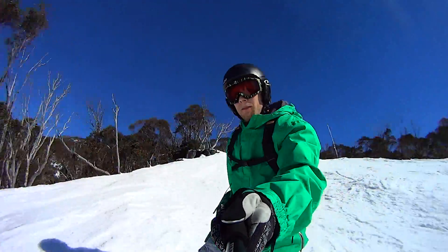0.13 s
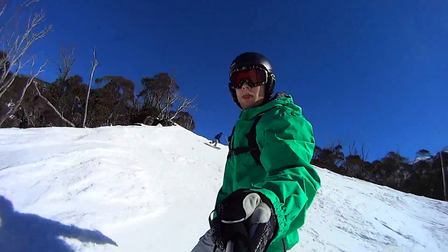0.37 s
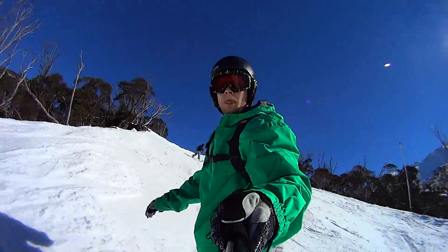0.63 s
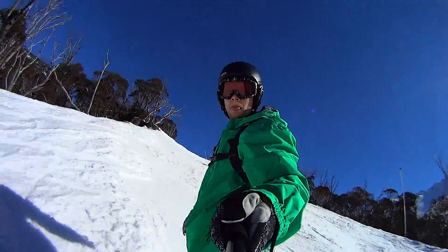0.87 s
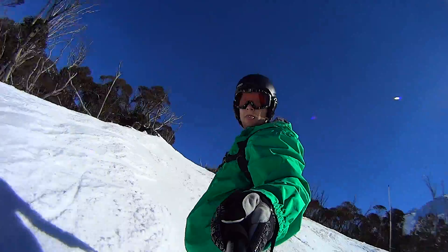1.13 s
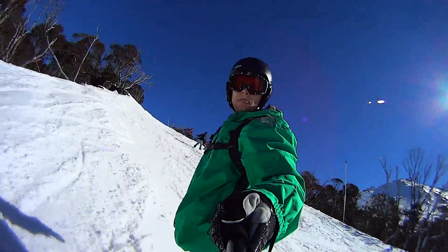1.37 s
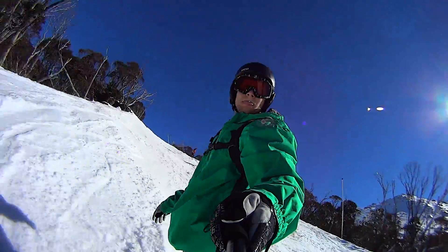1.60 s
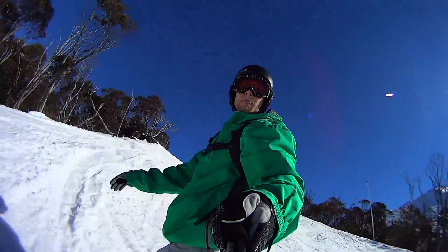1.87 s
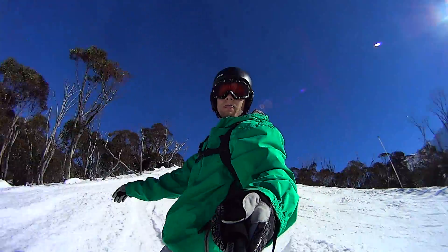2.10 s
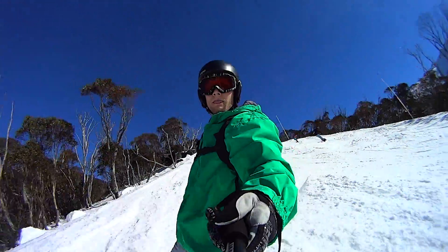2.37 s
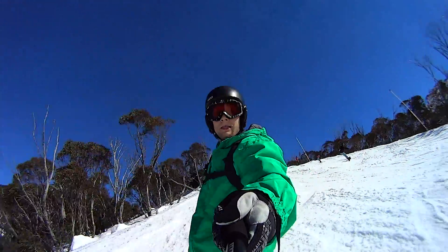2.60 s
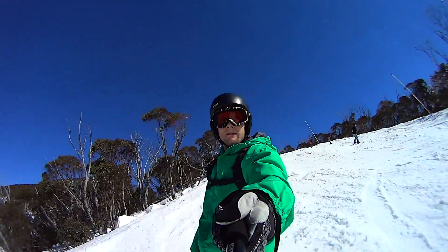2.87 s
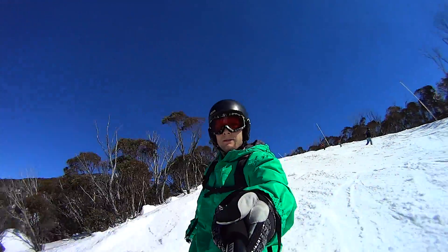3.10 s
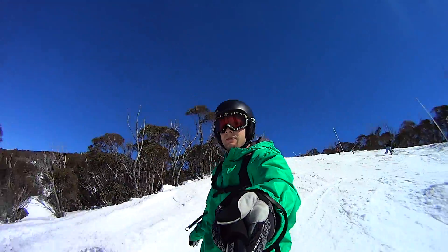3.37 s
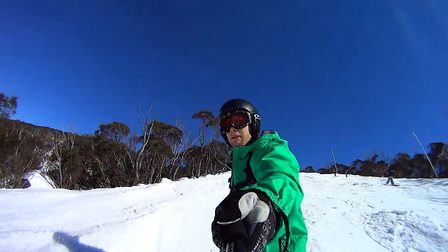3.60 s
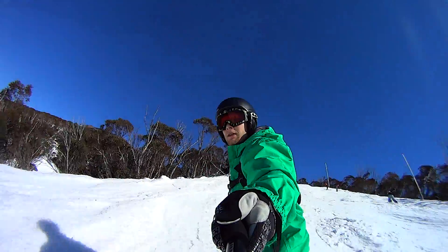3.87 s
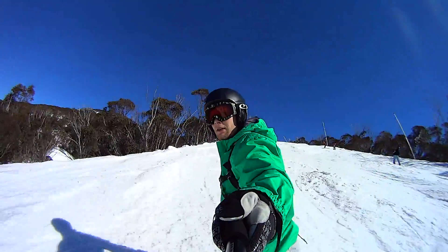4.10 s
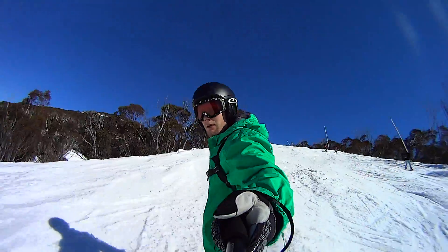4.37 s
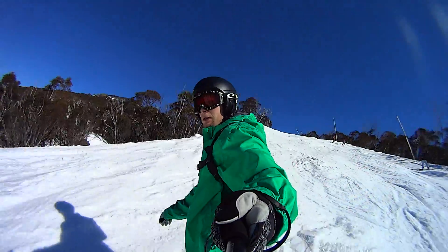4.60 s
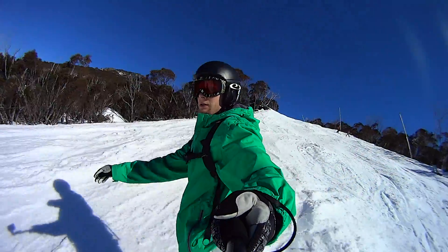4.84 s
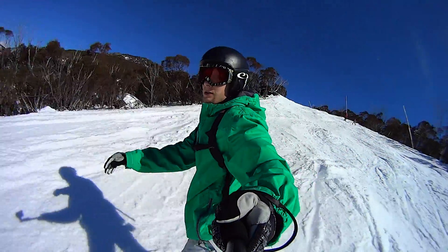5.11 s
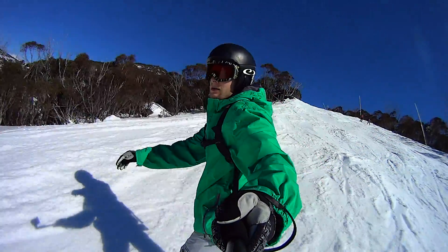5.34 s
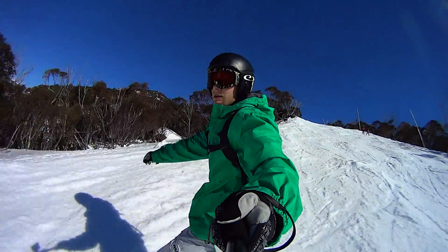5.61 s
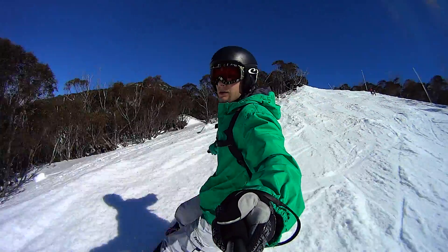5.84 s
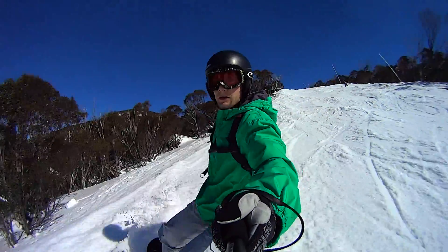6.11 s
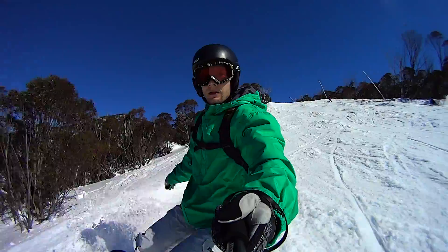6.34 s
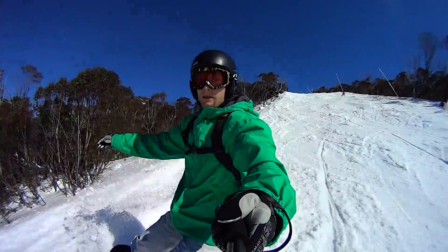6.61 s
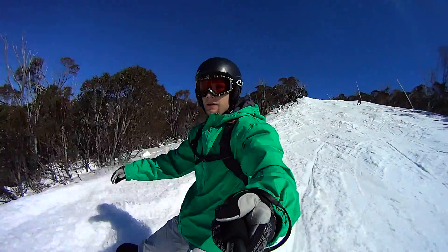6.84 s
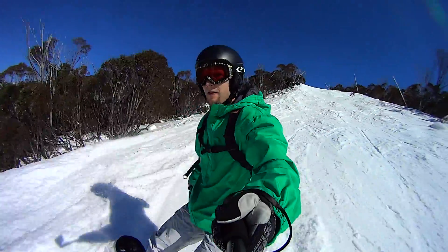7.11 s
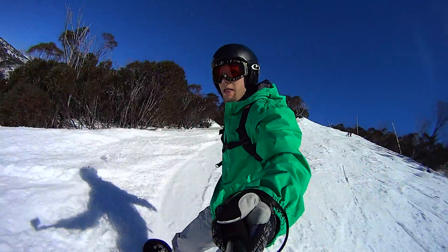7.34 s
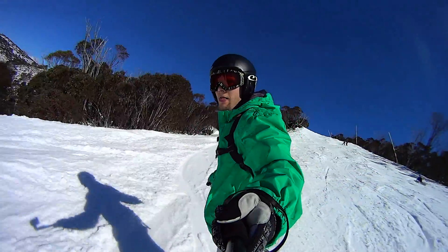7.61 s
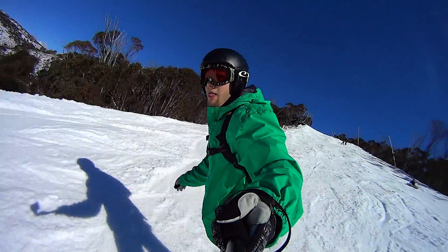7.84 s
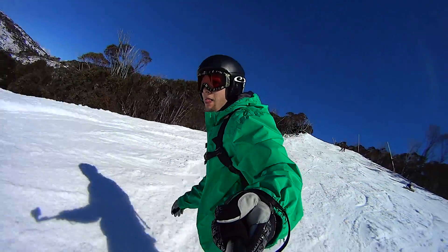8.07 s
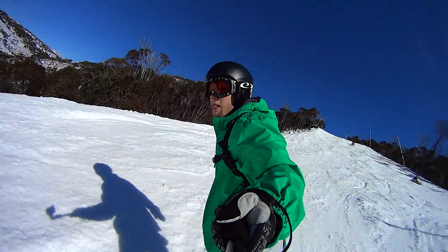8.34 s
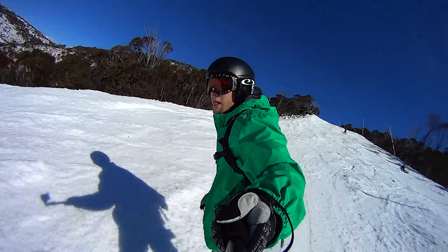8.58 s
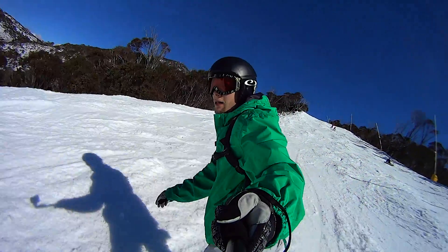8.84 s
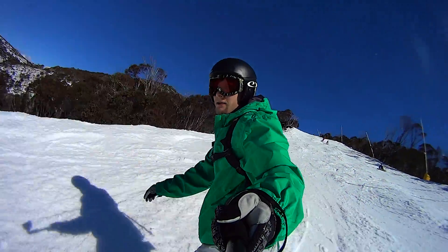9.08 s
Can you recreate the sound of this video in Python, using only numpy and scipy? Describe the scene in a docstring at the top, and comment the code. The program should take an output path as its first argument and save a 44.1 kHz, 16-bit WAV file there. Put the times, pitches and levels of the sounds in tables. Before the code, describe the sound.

A snowboard glides over packed snow with a thin, grainy hiss and short edge scrapes. Just after two seconds, jolts thump the pole and its plastic mount clacks and rattles. Strong scrapes follow at around three and five seconds, then three long harsh carves near the end. Outdoors on an open slope, heard close through a sealed plastic case, coloured boxy and nasal, with low rumble.

```python
"""A snowboard slides and carves over packed snow: its edge crushes grains into scrape, low grind and fine spray.
The microphone is a camera's two ports, shut in a hard plastic case on a hand-held pole.
Noise grains ring the resonances of the case, and crusts breaking under the edge briefly change their level.
Filtered noise makes the low rumble of the shaken case; jolts up the pole are struck boom and knock modes.
The mount clacks as ringing modes, and around the clacks it shudders as a hollow chatter of grains."""
import sys
import numpy as np
from scipy import signal
from scipy.fft import next_fast_len
from scipy.io import wavfile

SR = 44100
rng = np.random.default_rng(int(sys.argv[2]) if len(sys.argv) > 2 else 0)


def to_wav(s):
    """Save 16-bit WAV."""
    ch = np.atleast_2d(s).T  # columns
    pcm = np.round(np.clip(ch, -1, 1) * 32767)  # PCM
    wavfile.write(sys.argv[1], SR, pcm.astype(np.int16))


def magnitude_from_level(level_db):
    """Linear magnitude for a level in decibels (20 dB per decade)."""
    exponent = np.asarray(level_db, float) / 20
    return 10 ** exponent


N = 406161  # length in samples
CONTROL_STEP = 20  # samples between the points of a slow control


def in_time(rows):
    """Columns of a curve table, drawn as straight lines between its times, at every sample."""
    seconds, *columns = np.transpose(rows)
    return [np.interp(np.arange(N) / SR, seconds, column) for column in columns]


def every_sample(coarse):
    """A slow control filled in between its points."""
    return np.interp(np.arange(N) / CONTROL_STEP, np.arange(len(coarse)), coarse)


def rms_one(x):
    """Scaled to unit power."""
    return x / np.sqrt(np.mean(np.abs(x) ** 2) + 1e-20)


def drift(rate_hz):
    """Slow random wander of unit rms: noise through two equal low-pass poles."""
    r = np.exp(-2 * np.pi * rate_hz * CONTROL_STEP / SR)
    settle = 2000
    noise = rng.standard_normal(N // CONTROL_STEP + 2 + settle)
    slow = signal.lfilter([1], [1, -2 * r, r * r], noise)[settle:]
    return every_sample(rms_one(slow))


def swells(starts, holds, peaks_db, rise_db_per_s, fall_db_per_s):
    """Power of each event as it rises to its peak, holds and falls: one row an event, in control steps."""
    starts, holds, peaks_db = [np.reshape(column, (-1, 1)) for column in (starts, holds, peaks_db)]
    t = np.arange(0, N + CONTROL_STEP, CONTROL_STEP) / SR - starts
    before_db = rise_db_per_s * np.maximum(-t, 0)
    after_db = fall_db_per_s * np.maximum(t - holds, 0)
    return magnitude_from_level(2 * (peaks_db - np.minimum(before_db + after_db, 100)))


def band(x, low_hz, high_hz):
    """Band-pass falling 12 dB an octave on each side."""
    return signal.sosfilt(signal.butter(2, [low_hz, high_hz], "band", fs=SR, output="sos"), x)


def crushing(spread_db, bumps_db, crunch_db):
    """Dense grains of uneven size in bumps and quick clumps: one stream both ports share, one more for each."""
    sizes = magnitude_from_level(spread_db * np.minimum(rng.exponential(1, N), 5))
    clumps = magnitude_from_level(bumps_db * drift(21) + crunch_db * drift(51))
    return rng.standard_normal((3, N)) * sizes * clumps


def through(modes, streams, flicker_db, brightness_db=0):
    """The grains ring each resonance; each reaches the two ports with its own balance, phase and likeness."""
    shared = signal.hilbert(streams[0], next_fast_len(N))[:N]
    out = np.zeros((2, N))
    for k, (hz, width_hz, level_db, pan_db, lead, alike) in enumerate(modes):
        r = np.exp(-np.pi * width_hz / SR)
        resonance = [(1 - r * r) / 2, 0, (r * r - 1) / 2, 1, -2 * r * np.cos(2 * np.pi * hz / SR), r * r]
        # wall and cavity ring in turn: the resonance acts twice, so its skirts fall steeply
        twice = [resonance, resonance]
        both = np.real(signal.sosfilt(twice, shared) * np.exp([[.5j * lead], [-.5j * lead]]))
        own = signal.sosfilt(twice, streams[1:])
        share = np.sqrt(alike)
        tone = np.sqrt(share) * both + np.sqrt(1 - share) * own
        # brightness acts from 2200 Hz up, in step with the octave, in full from about 12 kHz
        lift_db = brightness_db * np.clip(np.log2(hz / 2200) / 2.46, 0, 1)
        gain = magnitude_from_level(level_db + lift_db + flicker_db * drift(6.5))
        out += (-1) ** k * gain * tone * magnitude_from_level([[pan_db / 2], [-pan_db / 2]])
    return out


# The board gliding flat over the snow.
# Each row: time in seconds, scrape in dB, fineness of the snow in dB (lifts spray and upper case resonances).
GLIDE = [(0.0, -32.5, 0.5), (0.2, -30.5, 1.5), (0.34, -38, 0.5), (0.7, -33.5, -1), (1.08, -31.5, 1.5),
         (1.39, -36, -6), (1.6, -33, -3), (1.94, -33, -1.5), (1.99, -39.5, -1.5), (2.18, -38, -2.5),
         (2.66, -34, -2), (2.72, -32.5, 0.5), (2.92, -30, 3), (3.25, -25, 4.5), (3.55, -26, 4),
         (3.66, -34, 1.5), (4.0, -33, -0.5), (4.3, -30, 1), (4.64, -28.5, 2.5), (4.78, -31.5, 1.5),
         (5.26, -25, 5.5), (5.58, -30.5, 1), (5.67, -38, 1), (5.76, -32.5, 4.5), (5.96, -32, -1.5),
         (6.1, -30.5, 4), (6.6, -30.5, 2), (7.28, -31.5, 2.5), (7.44, -38, 2.5), (7.62, -36, -2),
         (8.8, -31, 2.5), (9.21, -28.5, 3.5)]
# The edge biting into the snow.
# Each row: start of full bite in seconds, hold in seconds, scrape in dB,
# brightness in dB of the upper case resonances.
BITES = [(0.136, .05, -29, -23), (0.225, 0.019, -27.5, -14), (0.402, 0.074, -32, -3),
         (0.574, 0.039, -33.5, -13), (0.798, 0.053, -32.5, 7), (0.877, 0.029, -22.5, -3),
         (1.18, 0.077, -31.5, 6), (2.232, .02, -31, -13), (2.36, 0.11, -31.5, -17),
         (2.485, .04, -31.5, -12), (2.73, 0.022, -27, 0), (2.85, .015, -28.5, 2),
         (3.295, 0.023, -19.5, -14), (3.38, 0.038, -15, -9), (3.534, 0.05, -15, -13),
         (4.113, 0.024, -30, 2), (4.247, .02, -28.5, 16), (4.34, 0.15, -27.5, -7),
         (4.693, 0.013, -25.5, -8), (4.875, 0.022, -33, -9), (4.997, .004, -33, -26),
         (5.071, 0.11, -17.5, -18.5), (5.325, 0.11, -17, -25.5), (5.715, 0.033, -29.5, -18),
         (5.795, 0.027, -30.5, -21), (6.043, .01, -29, -18), (6.114, 0.0044, -35.5, -7),
         (6.235, .015, -27, -8), (6.335, 0.043, -29, 5), (6.474, 0.028, -27, -1), (7.248, 0.033, -29.5, -9),
         (7.723, 0.297, -15, -12), (8.075, 0.32, -14.5, -10.5), (8.435, 0.27, -15.5, -5.5),
         (8.89, 0.059, -20.5, -13.5), (9.047, .025, -26.5, -24), (9.148, 0.038, -21, -21)]
BITE_RISE_DB_PER_S, BITE_FALL_DB_PER_S = 190, 220
GLIDE_BRIGHTNESS_DB, FINE_BRIGHTENS = 0.5, 0.45  # brightness at zero fineness; dB per dB of fineness


def edge():
    """Glide and bites add in power, and their brightness is averaged by power, so the loudest sets it."""
    glide_db, fine_db = in_time(GLIDE)
    starts, holds, peaks_db, bites_bright_db = np.transpose(BITES)
    bites = swells(starts, holds, peaks_db, BITE_RISE_DB_PER_S, BITE_FALL_DB_PER_S)
    glide = magnitude_from_level(2 * glide_db)
    power = glide + every_sample(bites.sum(axis=0))
    glide_bright_db = GLIDE_BRIGHTNESS_DB + FINE_BRIGHTENS * fine_db
    weighted = glide * glide_bright_db + every_sample(bites_bright_db @ bites)
    return 10 * np.log10(power), weighted / power, fine_db


# Resonances of the closed case around the microphone.
# Each row: frequency in Hz, width in Hz, relative level in dB, left over right in dB,
# lead of the left port in radians, left-right likeness from 0 to 1.
CASE = [(1025, 700, -10.5, 19, 3.6, 0), (1402, 406, 4, 9, 1.2, 0.73), (1587, 591, 13.5, 3.5, 0.82, 0.99),
        (2303, 480, -6.5, -4, 1.53, 0.3), (3013, 468, 5, 2.5, 0.28, 0.04), (3500, 510, -13.5, -7, 0.31, 1),
        (3960, 326, -5, -5.5, 0.76, 0.05), (5012, 910, 0.5, 0, 0.45, 0.98), (5300, 550, -7.5, -4, 0.76, 0),
        (6460, 1300, -27, 21, 0.78, 0.6)]


def scrape(snow, scrape_db, brightness_db):
    """Crushed grains and breaking crusts ring the case, brighter or duller as the edge moves."""
    bright_swing_db = brightness_db - np.mean(brightness_db)
    tone = through(CASE, snow * crusts(), flicker_db=1.0, brightness_db=bright_swing_db)
    return magnitude_from_level(scrape_db) * rms_one(tone)


# Low resonances that the grains set grinding.
# Each row: frequency in Hz, width in Hz, relative level in dB, left over right in dB,
# lead of the left port in radians, left-right likeness from 0 to 1.
GRIND = [(258, 470, 3.85, 0.24, 1.38, 0.64), (566, 283, 1, 0.21, 1.7, 0.1),
         (821, 580, 1.1, 0.33, 0.59, 0.21)]
GRIND_DB, GRIND_FOLLOWS = -49.5, 0.8  # edge's part at a scrape of -30 dB; dB per dB of scrape
GRIND_OF_SHAKING_DB = -4  # part that shaking adds, against the rumble


def grind(snow, swing_db):
    """The same grains ring the low resonances, following the edge and the shaking in power."""
    tone = band(through(GRIND, snow, flicker_db=1.5), 130, 1500)
    from_edge = magnitude_from_level(GRIND_DB + GRIND_FOLLOWS * swing_db)
    from_shaking = shaking() * magnitude_from_level(GRIND_OF_SHAKING_DB)
    return np.hypot(from_edge, from_shaking) * rms_one(tone)


# High resonances that colour the fine snow.
# Each row: frequency in Hz, width in Hz, relative level in dB, left over right in dB,
# lead of the left port in radians, left-right likeness from 0 to 1.
SPRAY = [(6000, 2350, 6, -1, 4.23, 1), (7510, 1140, 9, -6.5, 4.7, 0.05), (8600, 830, -1.5, -18.5, 1.2, .1),
         (9380, 1560, 12.5, 1.5, 2.23, 0.72), (10900, 290, -4, -6, 10.4, 0.13)]
SPRAY_DB = -46  # at a scrape of -30 dB, with brightness and fineness at zero
SPRAY_FOLLOWS, SPRAY_BRIGHTENS = 0.34, 0.094  # dB per dB of scrape; dB per dB of brightness


def spray(swing_db, brightness_db, fine_db):
    """Grains of their own hiss through the high resonances, lifted by fine snow and a bright edge."""
    grains = crushing(spread_db=1.4, bumps_db=1.0, crunch_db=0.1)
    tone = through(SPRAY, grains, flicker_db=0.96)
    level_db = SPRAY_DB + SPRAY_FOLLOWS * swing_db + SPRAY_BRIGHTENS * brightness_db + fine_db
    return magnitude_from_level(level_db) * rms_one(tone)


def board():
    """Scrape, grind and spray come from crushed snow and follow the edge."""
    scrape_db, brightness_db, fine_db = edge()
    swing_db = scrape_db + 30
    snow = crushing(spread_db=2.0, bumps_db=0.0, crunch_db=1.0)
    low_and_mid = scrape(snow, scrape_db, brightness_db) + grind(snow, swing_db)
    return low_and_mid + spray(swing_db, brightness_db, fine_db)


# Rough ground shaking the pole in the hand.
# Each row: time in seconds, rumble in dB.
SHAKING = [(0.0, -55), (0.6, -47), (0.87, -56), (1.1, -51.5), (1.9, -56), (2.46, -38.5), (2.7, -46),
           (3.02, -41), (3.15, -45.5), (3.53, -43), (3.63, -50), (4.3, -47.5), (4.45, -40.5), (4.72, -47),
           (5.05, -45), (5.25, -41.5), (5.66, -38.5), (5.87, -39), (6.0, -41), (6.5, -46.5), (7.6, -49.5),
           (8.1, -56), (8.4, -49), (9.21, -51.5)]
AFTERSHAKE_DB, AFTERSHAKE_FALL_DB_PER_S = -18.5, 102  # against the jolt's level; its fading


def shaking():
    """Gain of the shaking: rough ground, and what each jolt leaves behind, added in power."""
    starts, jolts_db = np.transpose(JOLTS)[:2]
    after = swells(starts, 0 * starts, jolts_db + AFTERSHAKE_DB, 2000, AFTERSHAKE_FALL_DB_PER_S).sum(axis=0)
    ground = magnitude_from_level(2 * in_time(SHAKING)[0])
    return np.sqrt(ground + every_sample(after))


def rumble():
    """Lumpy low noise of the shaken case, nearly the same at both ports."""
    lumps = magnitude_from_level(2.5 * drift(14))
    noise = rng.standard_normal((2, N)) * lumps
    mid, side = band(band(noise, 19.6, 73), 28, 240)
    ports = mid + magnitude_from_level(-19.5) * side * [[1], [-1]]
    return shaking() * rms_one(ports)


# Crusts breaking under the edge.
# Each row: start in seconds, strength in dB (above 0 the grains rise, below 0 they dip),
# decay time to 1/e in seconds.
CRUSTS = [(0.176, 8.5, 0.0052), (0.223, 4.5, 0.02), (1.341, 5, 0.0051), (1.583, 5, 0.007),
          (2.001, 8.5, 0.006), (4.425, 4.5, 0.023), (4.489, 12, 0.0058), (5.809, 9, 0.006),
          (6.446, 5, 0.0047), (6.467, -2, 0.0078), (8.866, 3.5, 0.008)]


def crusts():
    """Each break changes the grain level at once and dies away; below 0 dB it dips."""
    t, level = np.arange(N) / SR, np.ones(N)
    for start, strength_db, decay in CRUSTS:
        level += (magnitude_from_level(strength_db) - 1) * (t >= start) * np.exp(-np.abs(t - start) / decay)
    return level


def ring(clicks, hz, t60):
    """A unit click sets a decaying sine ringing, of height 1 at its start; t60 in seconds."""
    r, w = magnitude_from_level(-60 / (t60 * SR)), 2 * np.pi * hz / SR
    # the tiny offset keeps the filter clear of vanishing numbers
    return signal.lfilter([0, np.sin(w)], [1, -2 * r * np.cos(w), r * r], clicks + 1e-18)


def struck(start, level_db, modes, spread_db, soft_hz):
    """A blow strikes each mode with a strength of its own; a soft contact is a low-passed click."""
    at, out = int(np.round(start * SR)), np.zeros(N)
    for k, (hz, mode_db, t60) in enumerate(modes):
        clicks = np.zeros(N)
        clicks[at] = magnitude_from_level(level_db + mode_db + spread_db * rng.standard_normal())
        out += (-1) ** k * ring(clicks, hz, t60)
    return signal.sosfilt(signal.butter(2, soft_hz, fs=SR, output="sos"), out)


# Jolts coming up the pole.
# Each row: start in seconds, level in dB before the contact softens it, boom in Hz,
# knock in dB against the boom, hardness as contact cut-off in Hz.
JOLTS = [(.210, -23.5, 93, 0.5, 900), (0.457, -23.5, 82, -4.5, 960), (1.540, -36.5, 62, -8, 600),
         (2.211, -25.5, 72, -13, 600), (2.332, -21.5, 85, -17, 600), (2.987, -46, 80, 1, 600),
         (4.129, -21, 63, -6, 305), (4.365, -32, 85, -2, 400), (4.471, -26, 67.6, -14, 393),
         (6.236, -21, 68, -6.5, 280), (6.732, -36, 65, -12, 400)]
# Ring of the pole above its boom.
# Each row: frequency in Hz, relative level in dB, time to fall 60 dB in seconds.
POLE = [(312, 0.5, 0.067), (500, 3, 0.041), (713, -0.5, 0.033)]
BOOM_T60_S = 0.11


def jolts():
    """A short boom of its own pitch and a knock of the pole, as dull as the contact is soft."""
    out = np.zeros(N)
    for start, level_db, boom_hz, knock_db, hard_hz in JOLTS:
        boom = [(boom_hz, 0, BOOM_T60_S)]
        out += struck(start, level_db + knock_db, POLE, spread_db=1.5, soft_hz=hard_hz)
        out -= struck(start, level_db, boom, spread_db=1, soft_hz=150)
    return out


# Clacks of the mount close to the microphone.
# Each row: start in seconds, level in dB before the contact softens it, hardness as contact cut-off in Hz.
CLACKS = [(2.2297, -9.5, 2800), (2.3429, -6.5, 6000), (2.3538, -7, 9000), (2.3618, -11, 5500),
          (2.3767, -6.5, 7500), (5.8622, -17, 14000)]
# Ring of the mount.
# Each row: frequency in Hz, relative level in dB, time to fall 60 dB in seconds.
MOUNT = [(474, -15, 0.025), (763, -21.5, 0.052), (1600, -6.5, 0.02), (2660, -3.5, 0.01), (3280, -7, 0.02),
         (4700, -15.5, 0.011), (5100, -25, .012), (6300, -32, 0.0033)]
REBOUND_S = 0.001722


def clacks():
    """Hard plastic on plastic, each contact rebounding once at once, a little nearer the left port."""
    first = np.zeros(N)
    for start, level_db, hard_hz in CLACKS:
        first += struck(start, level_db, MOUNT, spread_db=1.5, soft_hz=hard_hz)
    lag = int(REBOUND_S * SR)
    rebound = np.concatenate([np.zeros(lag), first[:-lag]])
    return (first + magnitude_from_level(-3) * rebound) * magnitude_from_level([[1.2], [-1.2]])


# A hollow rattle of the loose mount around the clacks, from 2.2 to 2.65 s.
# Each row: start of full level in seconds, hold in seconds, level in dB.
SHUDDER = [(2.235, 0.1, -41), (2.354, 0.031, -32), (2.466, 0.054, -37.5), (2.56, 0.063, -45.5)]
# Hollow resonances of the loose mount.
# Each row: frequency in Hz, width in Hz, relative level in dB, left over right in dB,
# lead of the left port in radians, left-right likeness from 0 to 1.
HOLLOW = [(336, 120, -0.5, 3, 1, 0.5), (532, 83, -2, 1, 0.59, 0.6), (726, 140, -2.5, 0, .8, 0.9)]
SHUDDER_RISE_DB_PER_S, SHUDDER_FALL_DB_PER_S = 400, 225


def shudder():
    """A hollow chatter of small knocks: very uneven grains through the mount's resonances."""
    knocks = crushing(spread_db=4.0, bumps_db=3.0, crunch_db=2.0)
    starts, holds, peaks_db = np.transpose(SHUDDER)
    power = swells(starts, holds, peaks_db, SHUDDER_RISE_DB_PER_S, SHUDDER_FALL_DB_PER_S).sum(axis=0)
    return np.sqrt(every_sample(power)) * rms_one(through(HOLLOW, knocks, flicker_db=0.71))


def scene():
    """Board, case, pole and mount together, as they reach the two ports."""
    return board() + rumble() + jolts() + clacks() + shudder()


def band_limit(x):
    """A steep low-pass at the top of the band."""
    return signal.sosfilt(signal.butter(12, 11250, fs=SR, output="sos"), x)


def record(dry):
    """The highest peaks are rounded and the top is cut steeply."""
    rounded = np.tanh(dry)
    steep = signal.ellip(14, .5, 60, 11170, fs=SR, output="sos")  # cut-off in Hz
    mix = signal.sosfilt(steep, rounded)
    return band_limit(mix)


dry = scene()
out = record(dry)
to_wav(out)
```